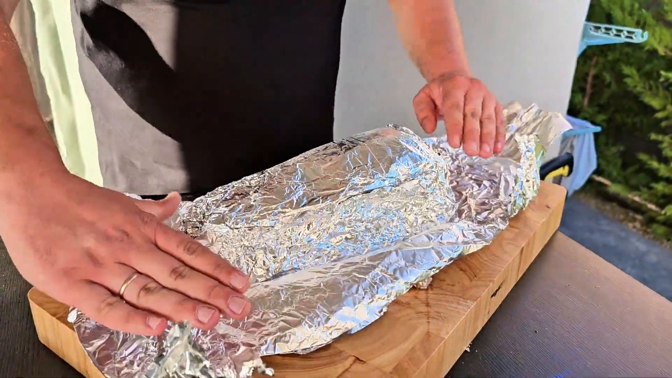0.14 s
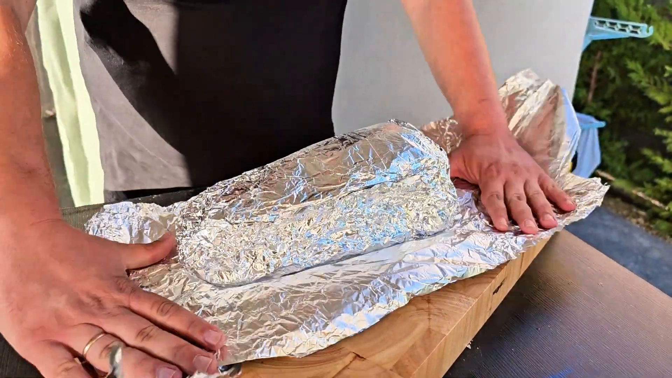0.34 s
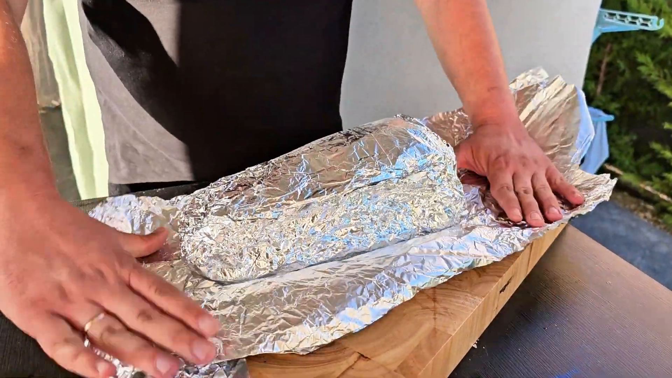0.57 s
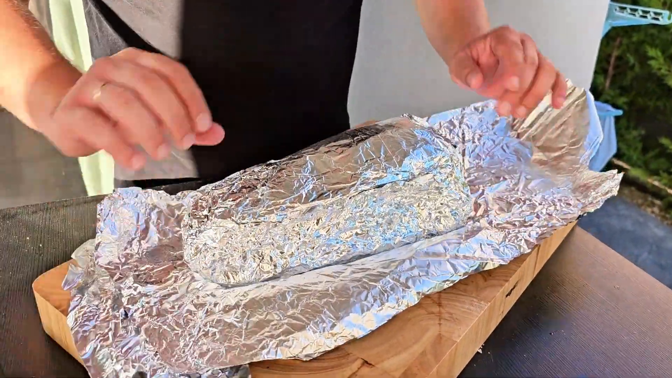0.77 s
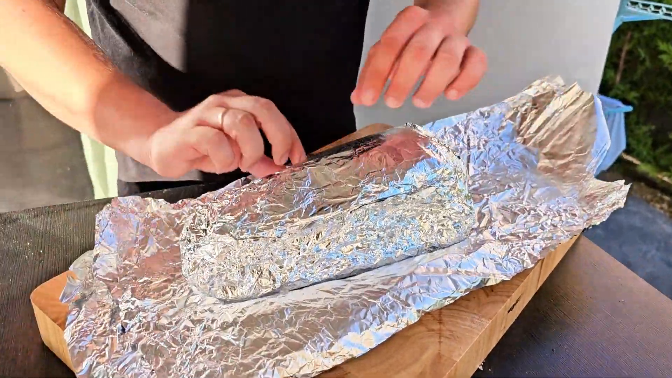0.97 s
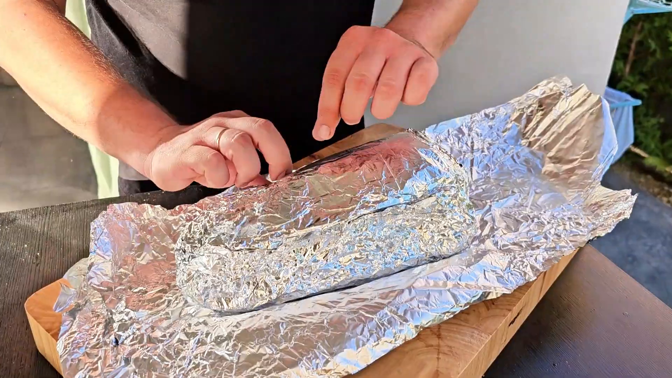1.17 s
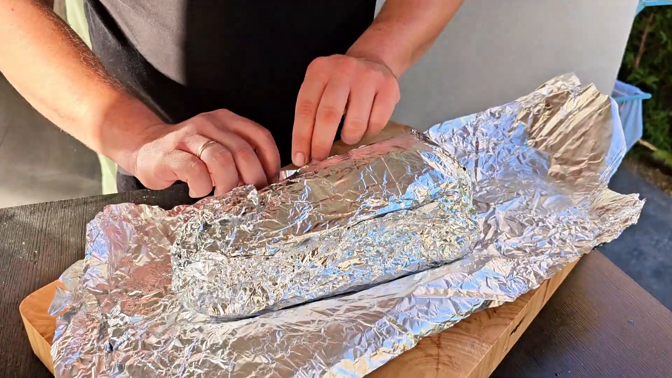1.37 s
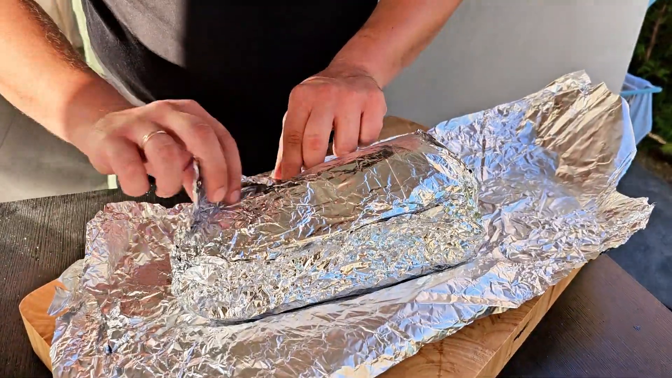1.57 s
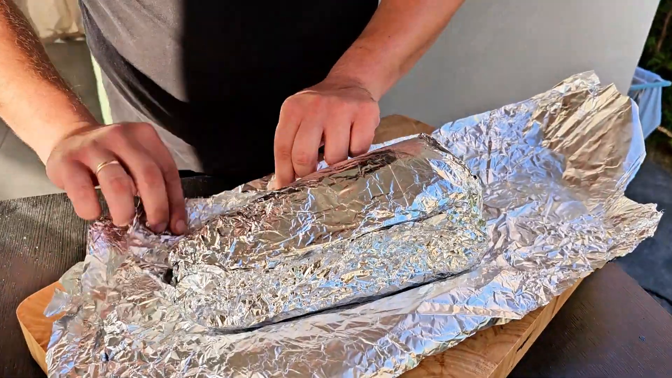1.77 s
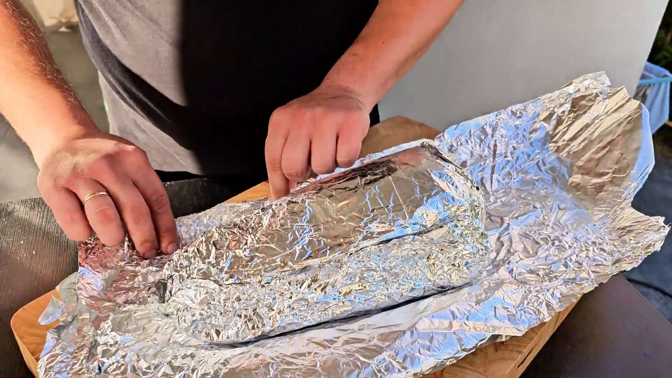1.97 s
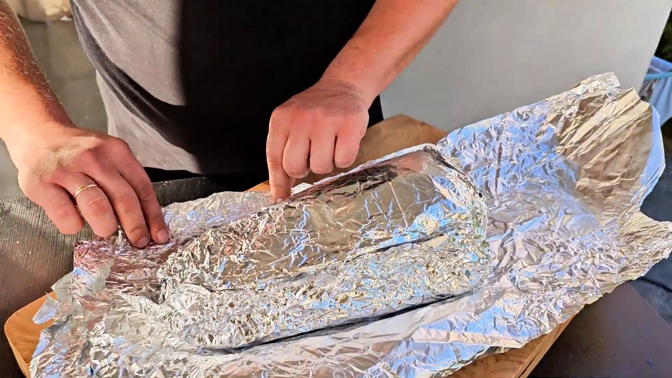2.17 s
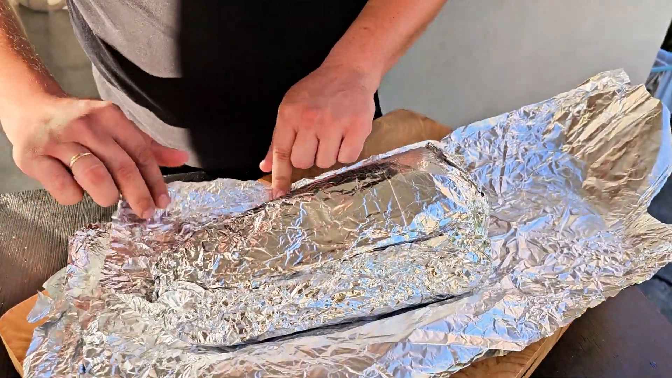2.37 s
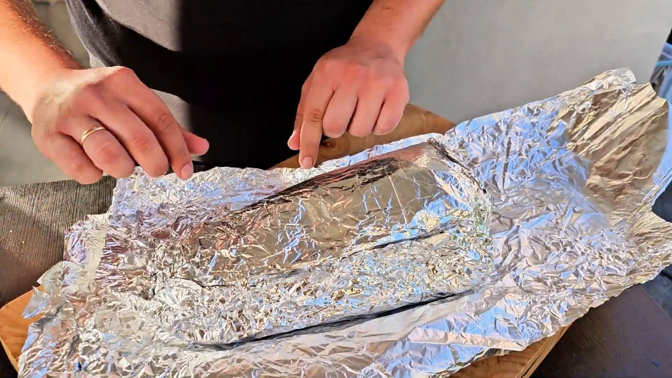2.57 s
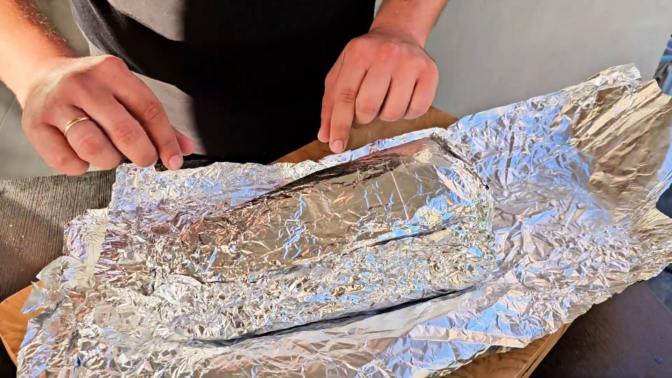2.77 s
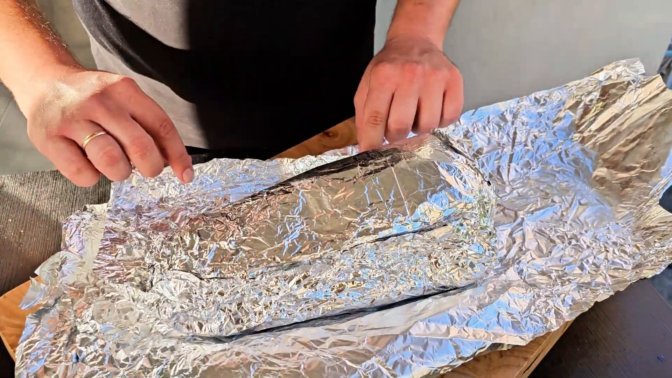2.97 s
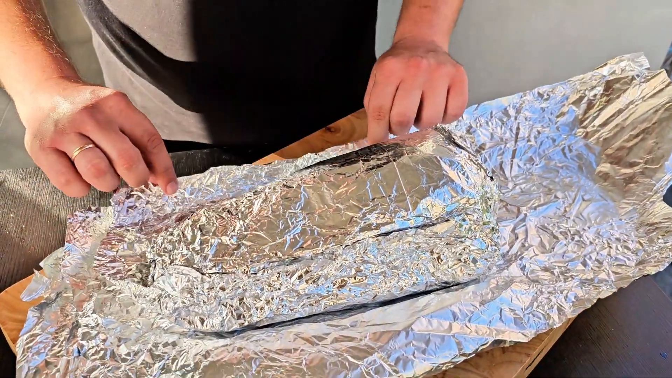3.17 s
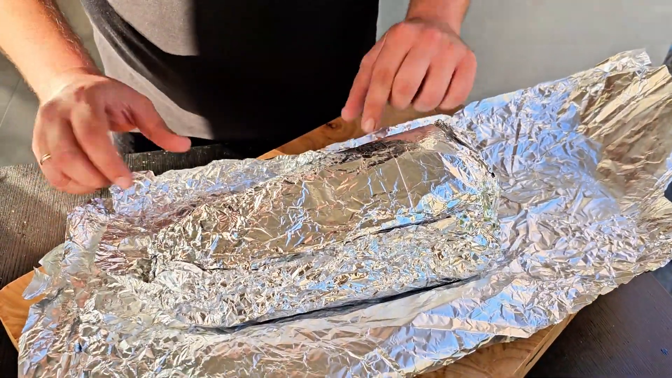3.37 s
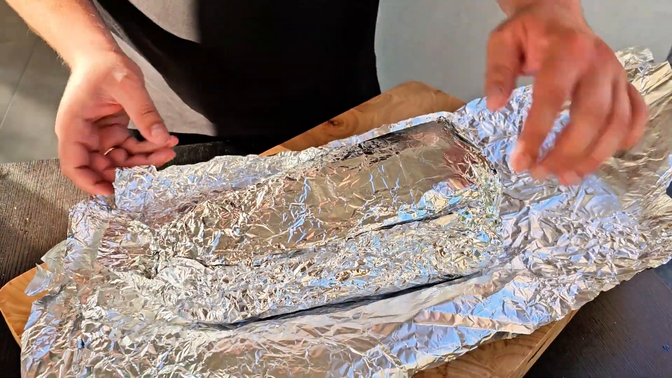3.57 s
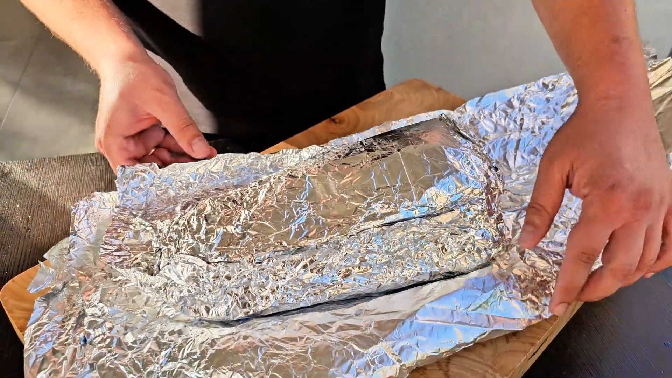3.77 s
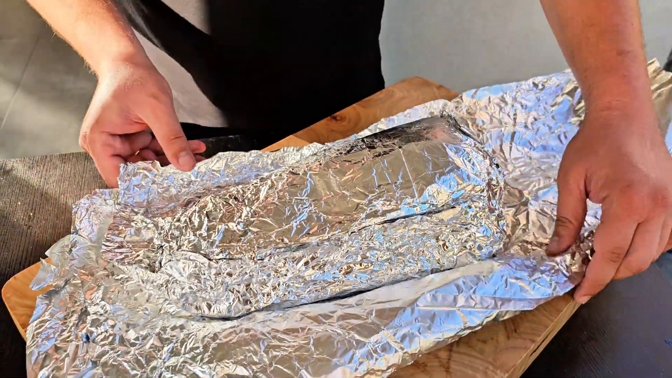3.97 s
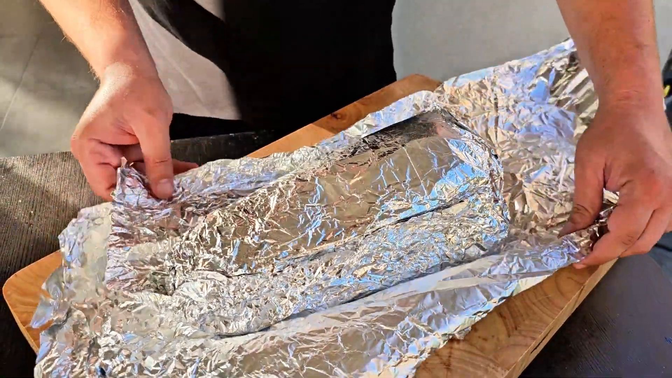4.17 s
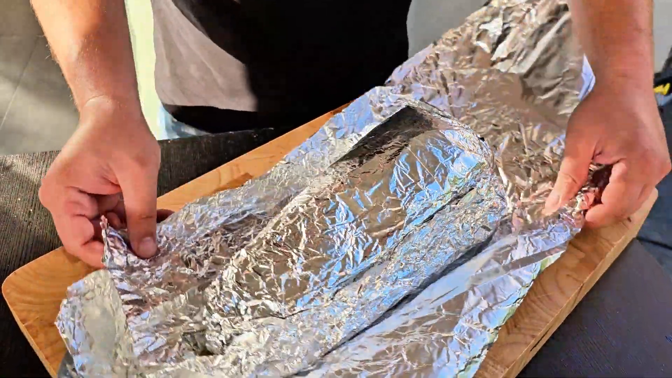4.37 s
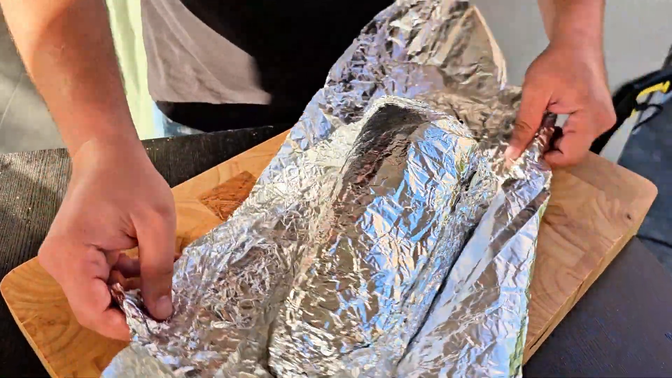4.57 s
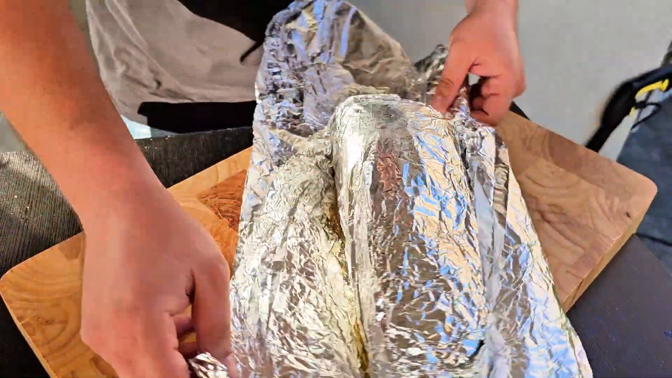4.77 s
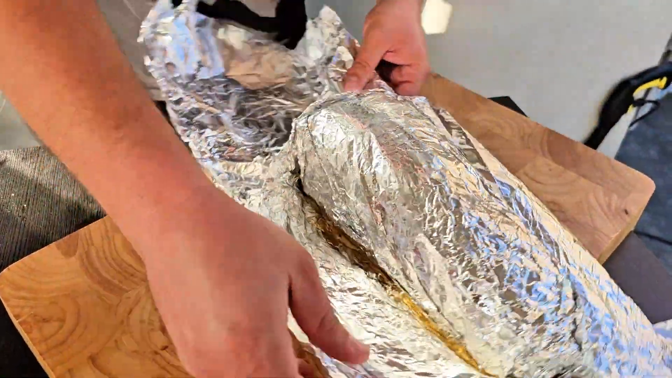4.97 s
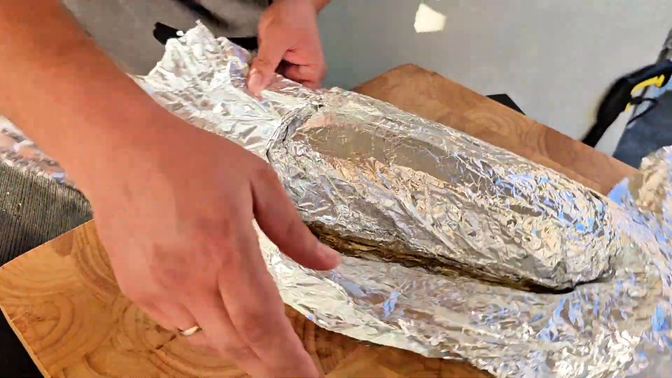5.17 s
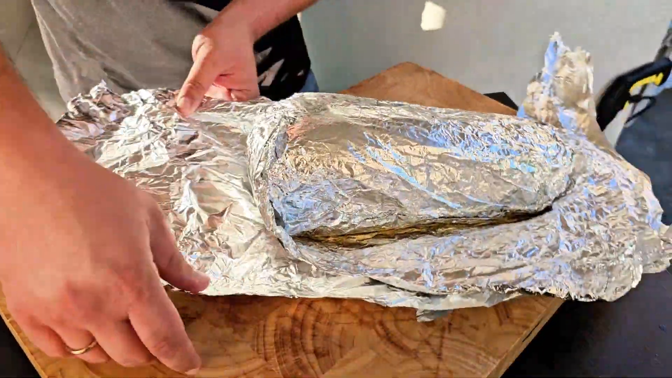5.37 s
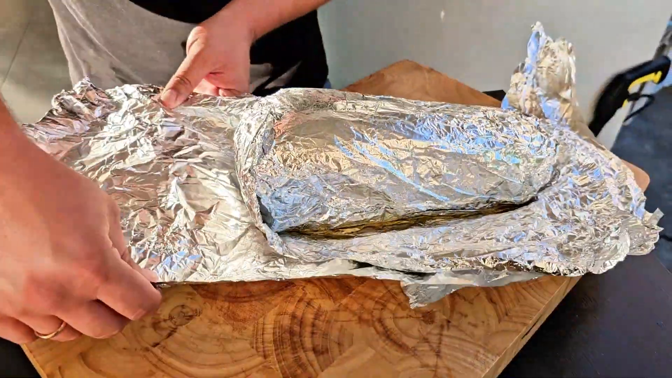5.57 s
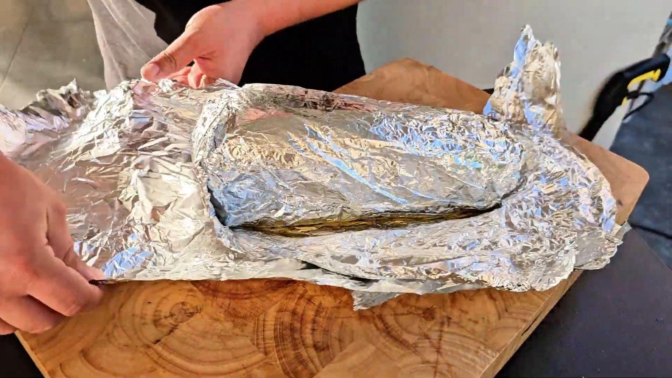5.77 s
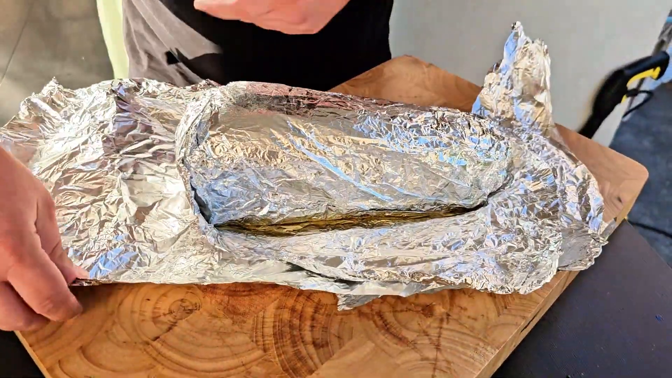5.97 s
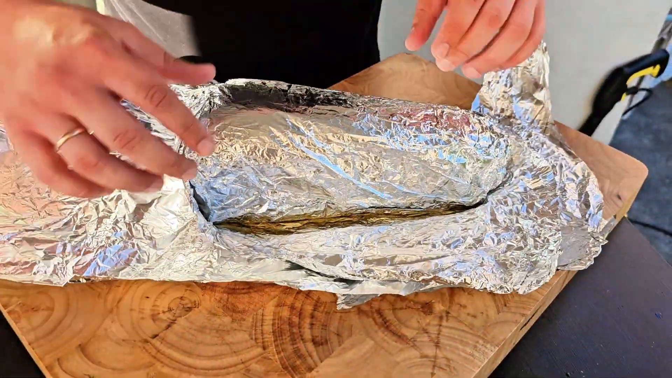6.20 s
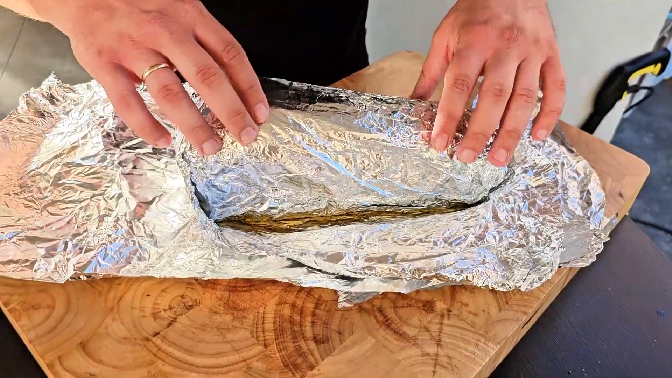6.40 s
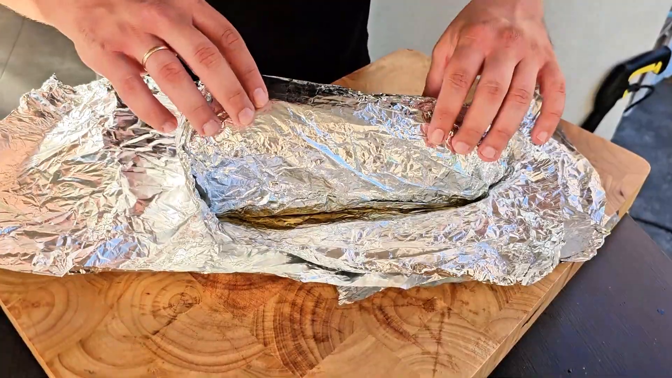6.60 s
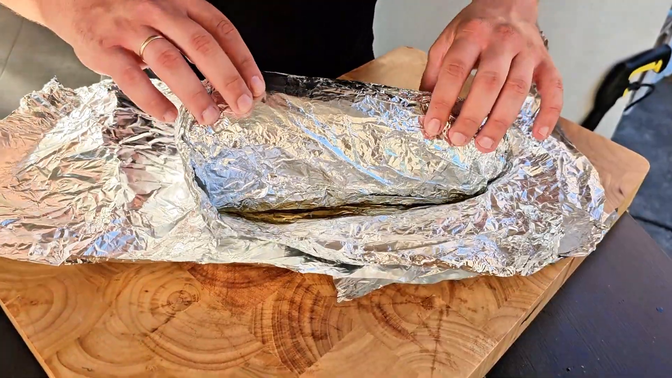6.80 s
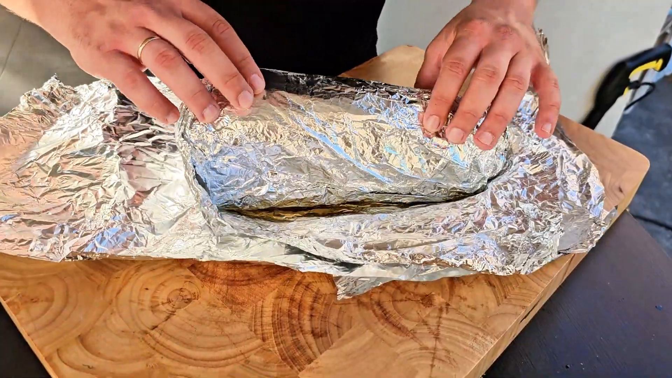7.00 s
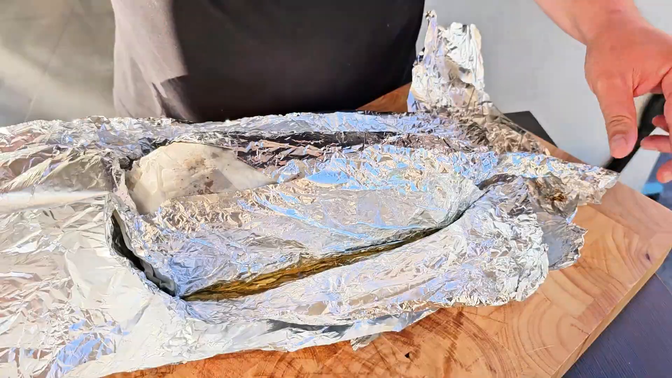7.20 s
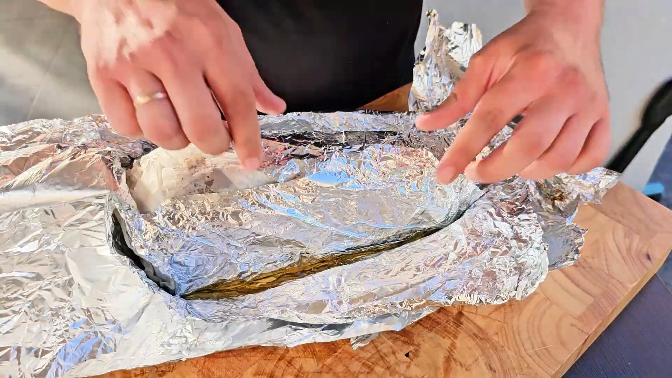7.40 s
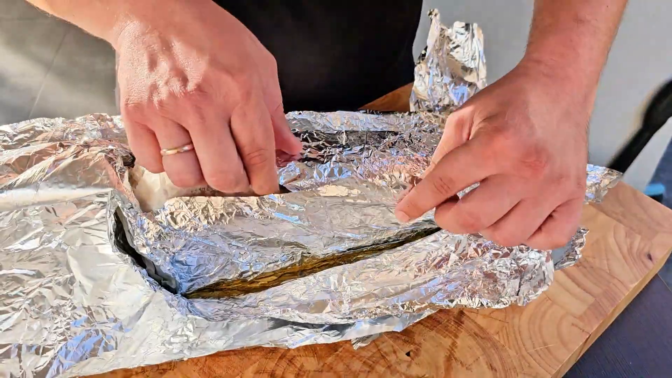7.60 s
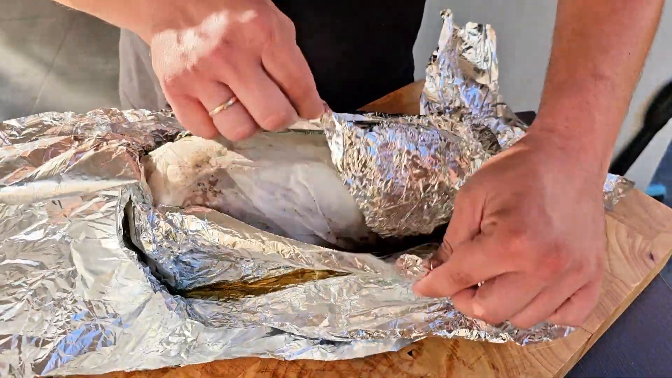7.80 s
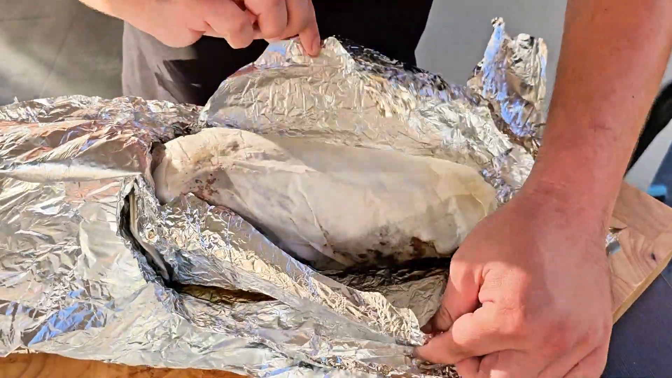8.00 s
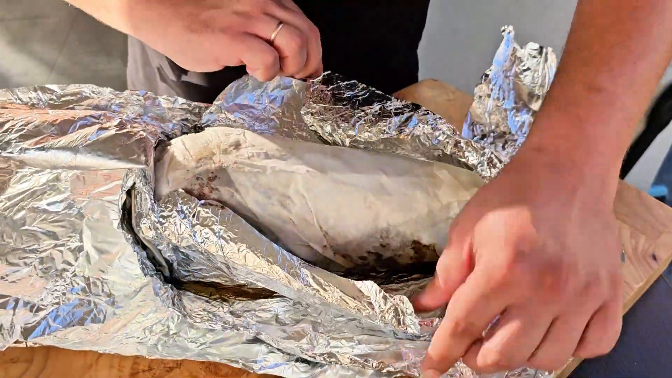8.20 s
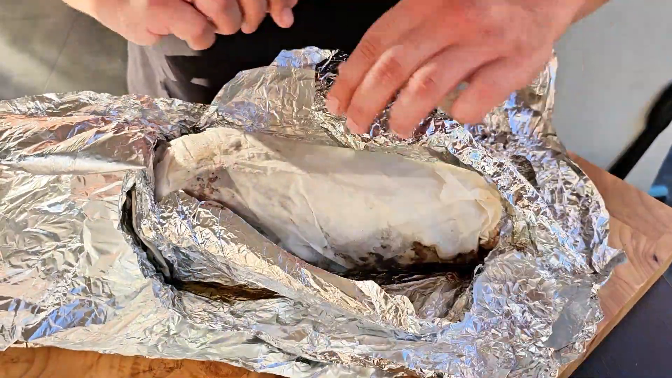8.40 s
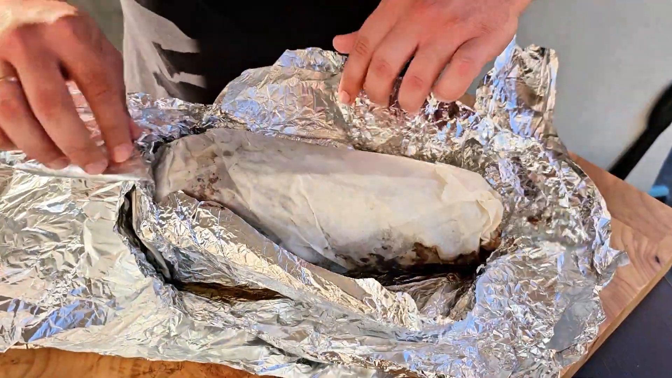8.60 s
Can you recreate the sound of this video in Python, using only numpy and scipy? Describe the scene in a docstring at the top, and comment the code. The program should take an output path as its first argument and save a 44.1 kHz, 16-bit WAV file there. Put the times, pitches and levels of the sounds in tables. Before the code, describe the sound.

Aluminium foil crinkles and crackles in irregular bursts as hands unwrap a parcel on a wooden board, close up.

```python
"""On a patio, hands unwrap a foil parcel on a wooden board, close to a single microphone.
Creases buckle as short bursts of hiss, facets tinkle, larger folds snap and slack panels pop.
Pressing, dragging and landing the parcel set board and table sounding; firm rubs give hollow tones.
Quiet outdoor air lies below. Near the end the level dips briefly and the air stays quieter."""
import sys
import numpy as np
from scipy import signal
from scipy.fft import rfft, irfft
from scipy.io import wavfile
from scipy.ndimage import uniform_filter1d

SR = 44100
rng = np.random.default_rng(int(sys.argv[2]) if len(sys.argv) > 2 else 0)


def master_out(mix):
    """Clip the mix to full scale and print it as 16-bit PCM to the path in sys.argv[1]."""
    frames = np.transpose(np.atleast_2d(mix))
    ceiling = np.clip(frames, -1, 1)
    pcm = np.round(ceiling * 32767).astype(np.int16)
    wavfile.write(sys.argv[1], SR, pcm)


N = 381465
TIME_S = np.arange(N) / SR


def from_db(db):
    return 10 ** (np.asarray(db) / 20)


def rms_one(x):
    return x / np.sqrt(np.mean(x ** 2) + 1e-20)


def at_hz(points, hz):
    """Curve lookup on a log-frequency axis."""
    points_hz, values = np.transpose(points)
    return np.interp(np.log(hz), np.log(points_hz), values)


def bands(low_hz=300):
    """Third-octave band-passes: (centre_hz, sos)."""
    edges = low_hz * 2 ** np.arange(0, np.log2(19000 / low_hz), 1 / 3)
    return [(np.sqrt(a * b), signal.butter(2, [a, b], "band", fs=SR, output="sos"))
            for a, b in zip(edges, edges[1:])]


def below(hz, corner_hz, octaves):
    """Shelf weight: 0 at the corner, 1 from `octaves` under it."""
    return np.clip(np.log2(corner_hz / hz) / octaves, 0, 1)


def resonance(x, hz, width_hz):
    """Two-pole band-pass, unity peak gain."""
    r = np.exp(-np.pi * width_hz / SR)
    feedback = [1, -2 * r * np.cos(2 * np.pi * hz / SR), r * r]
    return signal.lfilter(np.array([1, 0, -1]) * (1 - r * r) / 2, feedback, x)


def decay(power, t60_s):
    """Amplitude envelope of decaying power impulses."""
    return np.sqrt(signal.lfilter([1], [1, -from_db(-120 / (t60_s * SR))], power + 1e-18))


# Outdoor air spectrum: freq_hz, density_db
AIR_SPECTRUM = [(100, -26), (240, -29), (400, -20), (850, -11), (1300, -17), (2300, -26), (3300, -18),
                (5500, -14.5), (7500, -26.5), (15800, -23.5)]

def air(level_db=-76.5):
    """Steady faint hiss of open air."""
    hz = np.maximum(np.fft.rfftfreq(N, 1 / SR), 20)
    shape = from_db(at_hz(AIR_SPECTRUM, hz)) * (hz > 90)
    return from_db(level_db) * rms_one(irfft(rfft(rng.standard_normal(N)) * shape, N))


# Hands moving the foil: start_s, end_s, rustle_db, low_boost_db
MOVES = [(0.0, 0.15, -62.5, 1), (0.155, 0.45, -52, -1), (0.48, 0.57, -48, -5), (0.958, 1.394, -62.5, 4),
         (1.454, 1.924, -54.5, 2.5), (1.967, 2.201, -47, -1.5), (2.267, 2.439, -57, -2),
         (2.721, 2.785, -69.5, 13), (2.954, 3.102, -62.5, 6), (3.165, 3.196, -58.5, 9),
         (3.22, 3.383, -65, 7.5), (3.429, 3.453, -62, 4), (3.694, 3.74, -54.5, -0.5), (3.74, 4.447, -45, 3),
         (4.45, 5.494, -47.5, 5), (5.53, 5.863, -45.5, 5), (5.89, 5.941, -54, 8), (5.95, 6.039, -61, 13.5),
         (6.05, 6.396, -69, 18), (6.404, 6.777, -63, 10.5), (6.79, 6.953, -73, 14.5),
         (6.962, 7.134, -64.5, 8.5), (7.294, 7.31, -68.5, 9), (7.405, 7.44, -71, 6.5),
         (7.451, 7.681, -57.5, 3.5), (7.69, 8.033, -50.5, 2), (8.06, 8.225, -54.5, 2),
         (8.258, 8.448, -69, 7), (8.462, 8.556, -57, 6.5), (8.57, 8.66, -44.5, 2.5)]
# Squeezes of the parcel: crest_s, rustle_gain_db, half_length_s, board_db
SQUEEZES = [(0.0, 16.5, 0.095, -72), (0.29, 17.5, 0.11, -56.5), (1.324, 6.5, 0.26, -77),
            (1.56, 6.5, 0.16, -63.5), (1.802, 15, 0.1, -58.5), (2.158, 6.5, 0.1, -65),
            (2.424, 11.5, 0.18, -86), (3.048, 10.5, 0.069, -78), (3.293, 14.5, 0.036, -62),
            (4.161, 5, 0.072, -78), (4.788, 5.5, 0.44, -56), (5.29, 7.5, 0.21, -56), (5.637, 0, 0.21, -67),
            (5.766, 2.5, 0.047, -48.5), (5.882, 7.5, 0.056, -70), (7.83, 6.5, 0.48, -69),
            (8.195, 8.5, 0.094, -66.5), (8.296, 16.5, 0.05, -68), (8.65, 1.5, 0.11, -61)]

def handling(attack_db_per_s=1600, release_db_per_s=319, rest_db=-92):
    """Rustle level and low boost in dB: moves start fast, hold and die; squeezes swell the level."""
    start_s, end_s, level_db, low_db = np.array(MOVES).T[:, :, None]
    moves_db = level_db - attack_db_per_s * np.maximum(start_s - TIME_S, 0)
    moves_db -= release_db_per_s * np.maximum(TIME_S - end_s, 0)
    swell_db = sum(db * np.maximum(1 - abs(TIME_S - s) / half_s, 0) for s, db, half_s, _ in SQUEEZES)
    low_boost_db = uniform_filter1d(low_db[moves_db.argmax(axis=0), 0], SR // 20)
    return np.maximum(moves_db.max(axis=0) + swell_db, rest_db), low_boost_db


def creases(rustle_db, per_s, rate_slope, spread_db, clump_s=0.012, clump_db=2.5):
    """Random bucklings in clusters: (sample, power, pitch_hz)."""
    rate = per_s * from_db(rate_slope * (rustle_db - rustle_db.max()))
    clumps = rms_one(uniform_filter1d(rng.standard_normal(N), int(clump_s * SR)))
    at = np.flatnonzero(rng.random(N) < rate * from_db(clump_db * clumps) / SR)
    size, patch = rng.random((len(at), 2)).T
    size_db = spread_db * np.minimum(-np.log(size + 1e-9), 4)
    return at, from_db(2 * size_db) / rate[at], 400 * (18000 / 400) ** patch


# Foil rustle spectrum: freq_hz, density_db
FOIL_SPECTRUM = [(180, -47), (300, -33), (385, -12), (582, -8), (772, -5.5), (1230, -5), (1550, -3),
                 (4120, -3), (5560, 0.5), (15800, 3.5)]
# Damping of the sheet: freq_hz, t60_s
FOIL_DECAY = [(400, 0.19), (1500, 0.19), (5000, 0.07), (15000, 0.06)]

def rustle(buckles, hiss, low_boost_db, patch_octaves=9.3, even_s=0.35, lift_s=(3.2, 4.55), lift_db=-4):
    """Buckling creases gate a hiss that the sheet damps; lifted off the board, it loses its lows."""
    at, power, pitch_hz = buckles
    lifted = (TIME_S > lift_s[0]) & (TIME_S < lift_s[1])
    lifted_db = lift_db * uniform_filter1d(lifted.astype(float), SR // 10)
    out = np.zeros(N)
    for k, (hz, band) in enumerate(bands()):
        kicks = np.zeros(N)
        kicks[at] = power * np.exp(-(np.log2(hz / pitch_hz) / patch_octaves) ** 2)
        gate = decay(kicks, at_hz(FOIL_DECAY, hz))
        gate /= np.sqrt(uniform_filter1d(gate ** 2, int(even_s * SR)) + 1e-6)   # even running level
        shelves_db = below(hz, 7740, 1.54) * low_boost_db + below(hz, 1800, 1) * lifted_db
        out += signal.sosfilt(band, hiss[k % 2] * gate * from_db(at_hz(FOIL_SPECTRUM, hz) + shelves_db))
    treble = signal.sosfilt(signal.butter(4, 4000, "high", fs=SR, output="sos"), out)
    return out / np.std(treble)


def tinkle(rustle_db, per_s=250, q=28, gain_db=-7):
    """Scuffed flat facets ring briefly, each at its own pitch."""
    pitches_hz = np.geomspace(800, 9000, 36)
    hits = (rng.random(N) < per_s / SR) * np.minimum(rng.exponential(1, N), 3)
    facet = rng.integers(0, len(pitches_hz), N)
    scuff, out = rng.standard_normal(N), 0
    for k, hz in enumerate(pitches_hz):
        ring = resonance(scuff * decay(hits * (facet == k), t60_s=0.11), hz, hz / q)
        out += rms_one(ring) * from_db(at_hz(FOIL_SPECTRUM, hz)) * hz ** 0.36
    return from_db(rustle_db + gain_db) * rms_one(out)


# Wooden board modes: pitch_hz, width_hz, gain_db
BOARD_MODES = [(150.8, 6.2, -2), (200, 63, -4), (251.9, 4.7, 5), (348, 174, -5.5), (414, 33, -11)]

def board_rub(rustle_db, under_rustle_db=-29, fade_db=20.5, rest_db=-90):
    """Dragging excites the board: lightly under any rustle, strongly at squeezes."""
    loads_db = [db - fade_db * abs(TIME_S - s) / half_s for s, _, half_s, db in SQUEEZES]
    level_db = np.max(loads_db + [rustle_db + under_rustle_db], axis=0)
    friction = rng.standard_normal(N)
    wood = sum(from_db(db) * resonance(friction, hz, width_hz) for hz, width_hz, db in BOARD_MODES)
    return from_db(np.maximum(level_db, rest_db)) * rms_one(wood)


def ticks(rustle_db, per_s=130, over_rustle_db=13, limit_db=-43, lowest_hz=5000):
    """Small random snaps that follow the rustle level: (sample, power, pitch_hz)."""
    at, power, pitch_hz = creases(rustle_db, per_s, rate_slope=0, spread_db=2.5)
    level_db = np.minimum(rustle_db[at] + over_rustle_db, limit_db)
    return at, power * per_s * from_db(2 * level_db), np.maximum(pitch_hz, lowest_hz)


# Folds giving way: start_s, treble_db, mid_vs_treble_db, length_ms
FOLDS = [(0.108, -53, -13.5, 6.4), (0.159, -45.5, -7, 3.9), (0.231, -34.5, -9.5, 1.6),
         (0.438, -42, -13.5, 2.1), (0.4774, -43, -19, 6.1), (0.688, -57, -20, 4.5), (0.9495, -59, -2, 2.9),
         (0.968, -44.5, -13, 0.54), (1.049, -40.5, -17, 2.3), (1.063, -41, -15, 0.79),
         (1.139, -45, -19, 3.7), (1.102, -39, -30, 0.5), (1.1474, -30, -18, 0.5),
         (1.149, -39.5, -14.5, 0.8), (1.1914, -37.5, -10.5, 0.89), (1.241, -39, -13, 0.45),
         (1.299, -46.5, -35, 9.1), (1.455, -36, -11.5, 0.74), (1.602, -30, -10, 0.31),
         (1.67, -39, -14, 1.8), (1.682, -34.5, -11.5, 1.3), (1.78, -37, -9.5, 25.4),
         (1.874, -42.5, -13.5, 15.6), (1.9463, -41.5, -16, 1.3), (1.975, -37, -12, 1.7),
         (2.096, -32.5, -14, 2), (2.379, -38.5, -10.5, 1.3), (2.4006, -29.5, -24, 0.76),
         (2.416, -34, -13, 1), (2.43, -41, -8.5, 6.2), (3.025, -39, -30, 1.44), (3.093, -37, -26, 0.74),
         (3.1615, -42.5, -9.5, 1.1), (3.176, -54, -3.5, 16.6), (3.218, -50, -14, 4.9),
         (3.2463, -41, -34, 0.8), (3.268, -41, -12.5, 3.3), (3.342, -53.5, -5, 10), (3.382, -56.5, -7, 8.6),
         (3.43, -52, -12, 14.6), (3.46, -50.5, -18, 4.3), (3.754, -39.5, -17, 12.5), (3.803, -43, -13, 23),
         (3.973, -34, -10.5, 4.1), (4.084, -39, -11, 3.7), (4.122, -40.5, -14, 15),
         (4.165, -38.5, -18, 8.9), (4.658, -38, -12, 2.3), (4.745, -34.5, -10, 3), (4.786, -34, -25, 1.3),
         (4.905, -35, -2, 0.6), (5.1644, -29.5, -8, 0.8), (5.4532, -34, -5.5, 0.62), (5.526, -32, -16, 1.2),
         (5.6492, -36.5, -9, 2.6), (5.767, -31.5, -5, 1.8), (5.864, -39.5, -3.5, 14),
         (5.9932, -44.5, -14, 3.5), (6.143, -54.5, -3, 7.9), (6.327, -42.5, -23, 1.1),
         (6.341, -38.5, -17, 0.47), (6.395, -50.5, -3, 4), (6.465, -47.5, -9, 2.9), (6.543, -44, -13, 1.4),
         (6.598, -57, 0, 1.9), (6.642, -50, -14, 7.4), (6.7025, -56.5, -7.5, 17), (6.768, -44, -11.5, 1.7),
         (6.847, -53, -14, 2.2), (6.891, -49.5, -10, 2), (6.958, -50.5, -10, 2.4), (6.981, -51, -11, 1.9),
         (7.137, -58, -18, 13), (7.295, -62, -7.5, 6.7), (7.461, -46, -15, 6.1), (7.4842, -43, -10, 0.74),
         (7.536, -44, -19, 0.83), (7.739, -37, -11, 1.2), (7.776, -37, -12, 1.4),
         (7.8049, -37.5, -7.5, 4.6), (7.83, -40, -16, 2), (7.851, -40, -9, 2.7), (7.877, -39.5, -8.5, 8.9),
         (7.919, -40, -10, 2.5), (7.961, -38, -14, 2), (8.201, -37, -17, 2.4), (8.028, -35, -11, 1.2),
         (8.2935, -47.5, -20, 3.9), (8.467, -52.5, -4.5, 22.6), (8.581, -31, -12.5, 1)]
# Snap spectrum: freq_hz, density_db
SNAP_SPECTRUM = [(300, -14), (900, -7.5), (2500, -6.5), (6000, -5.5), (15000, -2.5)]

def snap_gates(rustle_db, fold_gain_db=5.5, usual_mid_db=-7.5, tint_db=2.5, tail_db=-4, tail_t60_s=0.085):
    """Band envelopes: folds crack in jerks among small ticks; a shimmer of the sheet follows each."""
    start_s, treble_db, mid_db, length_ms = np.transpose(FOLDS)
    run = np.maximum(length_ms * SR / 1000, 1).astype(int)
    fold = np.repeat(np.arange(len(run)), run)   # fold index of each sample in fold_at
    fold_at = np.concatenate([int(s * SR) + np.arange(n) for s, n in zip(start_s, run)])
    jerks = rng.exponential(1, N)[fold_at] ** 1.3
    jerks *= (run / np.bincount(fold, jerks))[fold]   # mean 1 per fold
    tints_db = tint_db * np.clip(rng.standard_normal((len(run), 24)), -1.5, 1.5)
    tick_at, tick_power, tick_hz = ticks(rustle_db)
    gates = []
    for k, (hz, _) in enumerate(bands()):
        fold_db = treble_db + fold_gain_db + tints_db[:, k]
        fold_db += below(hz, 9800, 1.8) * (mid_db - usual_mid_db)
        t60_s = 0.1 * at_hz(FOIL_DECAY, hz)
        retained = from_db(-120 / (t60_s * SR))   # power left after one sample
        build_up = (1 - retained ** run) / (1 - retained)
        kicks = np.zeros(N)
        kicks[fold_at] = jerks * (from_db(2 * fold_db) / build_up)[fold]
        kicks[tick_at] += tick_power * np.exp(-np.log2(hz / tick_hz) ** 2 / 2)
        kicks *= from_db(2 * at_hz(SNAP_SPECTRUM, hz))
        shimmer = from_db(tail_db) * decay(kicks * t60_s / tail_t60_s, tail_t60_s)
        gates.append(decay(kicks, t60_s) + shimmer)
    return gates


def crackle(rustle_db, low_boost_db):
    """Rustle and snaps gate the same two hisses, in opposite alternate bands."""
    buckles = creases(rustle_db, per_s=2500, rate_slope=0.97, spread_db=1.5)
    gates = snap_gates(rustle_db)
    hiss = rng.standard_normal((2, N))
    snaps = sum(signal.sosfilt(band, hiss[1 - k % 2] * gates[k]) for k, (_, band) in enumerate(bands()))
    return from_db(rustle_db) * rustle(buckles, hiss, low_boost_db) + snaps


TABLE_HZ = 54
# Table shaking: start_s, length_s, level_db
SHAKES = [(0.23, 0.13, -71), (1.75, 0.072, -68), (2.05, 0.055, -71), (3.978, 0.05, -70), (4.79, 0.39, -64),
          (5.132, 0.22, -63), (5.736, 0.17, -66.5), (6.072, 0.12, -68.5), (6.424, 0.15, -69.5),
          (7.746, 0.26, -70), (8.552, 0.1, -70)]

def table_rumble(fade_db_per_s=200, rest_db=-87):
    """Dragging shakes the table's low mode."""
    level_db = np.full(N, rest_db)
    for start_s, length_s, db in SHAKES:
        outside_s = np.maximum(abs(TIME_S - start_s - length_s / 2) - length_s / 2, 0)
        level_db = np.maximum(level_db, db - fade_db_per_s * outside_s)
    mode = resonance(rng.standard_normal(N), TABLE_HZ, width_hz=22)
    return from_db(level_db) * rms_one(resonance(mode, TABLE_HZ, width_hz=130))


# Firm rubs: start_s, end_s, pitch_hz, level_db
RUBS = [(0.228, 0.327, 232, -53.5), (0.273, 0.35, 130, -59), (2.717, 2.845, 885, -73),
        (3.586, 3.699, 684, -70), (4.492, 4.755, 301, -58), (4.777, 5.0, 244, -54),
        (4.804, 5.077, 137.5, -54), (5.648, 5.715, 1230, -56), (5.84, 5.88, 1070, -51.5),
        (4.722, 4.764, 1480, -44), (6.281, 6.38, 410, -66.5), (6.457, 6.567, 423, -59),
        (6.584, 6.743, 385, -69), (7.016, 7.132, 527, -67.5), (7.149, 7.212, 415, -68.5)]

def hollow_rubs(q_at_1khz=3, slip_db=2):
    """Friction swells and fades through one resonance, catching and slipping."""
    out = np.zeros(N)
    for start_s, end_s, hz, db in RUBS:
        progress = np.clip((TIME_S - start_s) / (end_s - start_s), 0, 1)
        swell = np.sin(np.pi * progress) ** 0.8
        tone = resonance(rng.standard_normal(N), hz, hz * np.sqrt(hz / 1000) / q_at_1khz)
        out += from_db(db) * swell * rms_one(resonance(tone, hz, hz / 2))
    slip = rms_one(uniform_filter1d(rng.standard_normal(N), SR // 20))
    return out * from_db(slip_db * slip)


# Parcel or hand landing: start_s, table_push_db, board_ring_db
THUDS = [(0.282, -46, -59.5), (3.97, -47, -78.5), (4.808, -56, -70), (5.319, -33, -60), (5.76, -41, -69)]

def thuds(contact_s=0.0061):
    """A soft, heavy contact pushes the table and rings the board."""
    push, blow = np.zeros(N), np.full(N, 1e-18)
    for start_s, push_db, ring_db in THUDS:
        at = int(start_s * SR)
        push[at], blow[at] = from_db(push_db), from_db(ring_db)
    push = np.convolve(push, np.hanning(int(contact_s * SR)))[:N]
    knock = sum(from_db(db) * resonance(blow, hz, width_hz) * SR / (2 * np.pi * width_hz)
                for hz, width_hz, db in BOARD_MODES)
    return knock + from_db(1.5) * resonance(push, TABLE_HZ, width_hz=47)


# Slack panels flipping: start_s, peak_db, pitch_hz
POPS = [(0.948, -45.5, 915), (1.048, -51, 1000), (1.148, -46.5, 960), (1.187, -47.5, 800),
        (1.611, -44.5, 765), (1.669, -39.5, 643), (1.682, -34.5, 780), (1.745, -40.5, 1550),
        (1.875, -37, 2060), (3.189, -46, 1155), (3.349, -55, 1520), (4.604, -41, 1256),
        (4.653, -34.5, 1220), (4.74, -39, 1090), (4.784, -33.5, 1060), (4.806, -41, 687),
        (4.83, -39.5, 1070), (4.973, -38, 1450), (5.051, -37.5, 1330), (5.066, -38, 1040), (5.3, -37, 1290),
        (5.764, -34, 1284), (6.397, -48, 530), (6.512, -46, 895), (6.816, -54, 792), (7.439, -56, 616),
        (7.704, -41, 1596), (8.2, -38, 2906), (8.48, -43, 2906)]

def pops(q=8, upper_db=-11.5, paper_db=-20.5, t60_s=0.04):
    """A panel flips with a papery scuff that rings two of its modes."""
    out, t = np.zeros(N), np.arange(int(0.06 * SR)) / SR
    for start_s, peak_db, hz in POPS:
        scuff = rng.standard_normal(len(t)) * from_db(-60 * t / t60_s)
        pop = rms_one(resonance(scuff, hz, hz / q))
        pop += from_db(upper_db) * rms_one(resonance(scuff, 1.29 * hz, 2 * hz / q))
        pop += from_db(paper_db) * rms_one(resonance(scuff, 2 * hz, 2 * hz))
        at = int(start_s * SR)
        out[at:at + len(t)] += (from_db(peak_db) * pop / abs(pop).max())[:N - at]
    return out


def scene(dip_s=7.222, dip_width_s=0.009, dip_db=-20, air_step_db=-5):
    """Mono mix on both channels; the level dips once and the air is quieter after."""
    rustle_db, low_boost_db = handling()
    foil = crackle(rustle_db, low_boost_db) + tinkle(rustle_db) + pops()
    contact = board_rub(rustle_db) + table_rumble() + hollow_rubs() + thuds()
    outdoors = air() * from_db(air_step_db * (TIME_S > dip_s))
    dip = from_db(dip_db * np.exp(-((TIME_S - dip_s) / dip_width_s) ** 2))
    return np.tile((foil + contact + outdoors) * dip, (2, 1))


def record(dry, cutoff_hz=15850):
    """Microphone: a peak near the top, then a steep low-pass."""
    peaked = dry + 2.5 * resonance(dry, hz=18150, width_hz=790)
    return signal.sosfilt(signal.ellip(12, 0.5, 75, cutoff_hz, fs=SR, output="sos"), peaked)


dry = scene()
out = record(dry)
master_out(out)
```